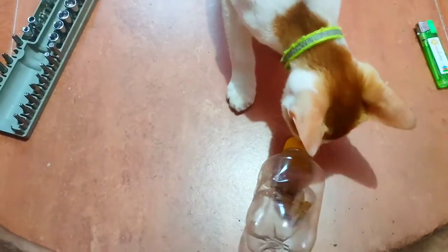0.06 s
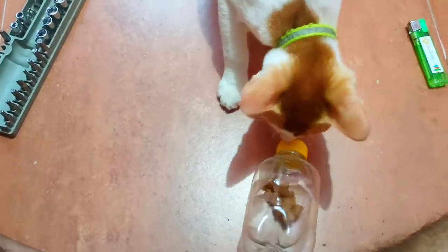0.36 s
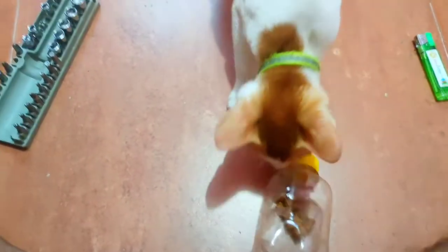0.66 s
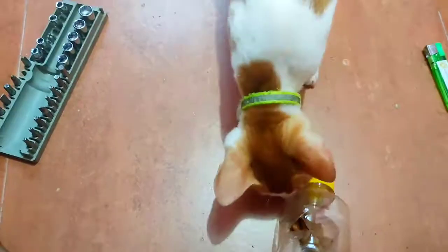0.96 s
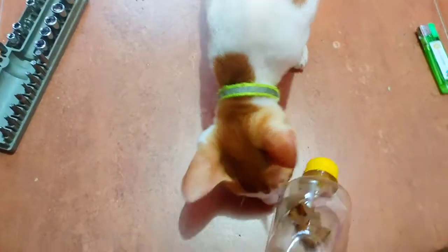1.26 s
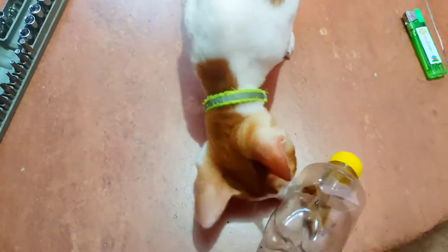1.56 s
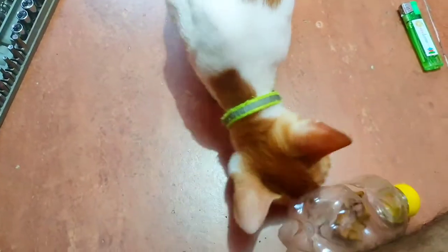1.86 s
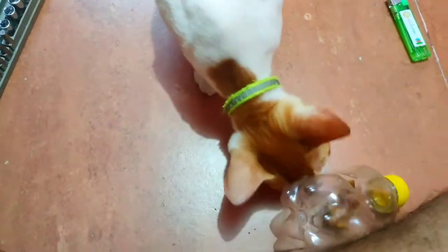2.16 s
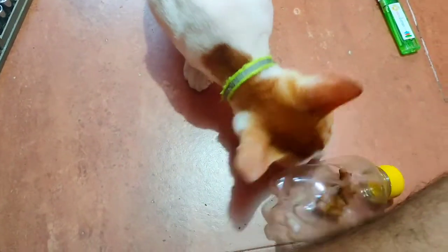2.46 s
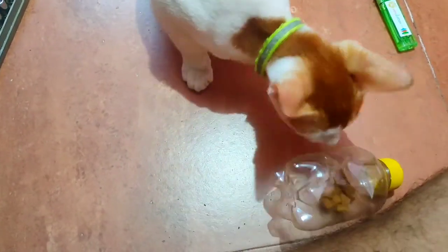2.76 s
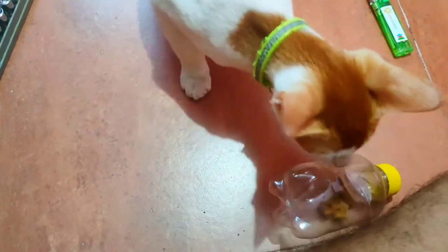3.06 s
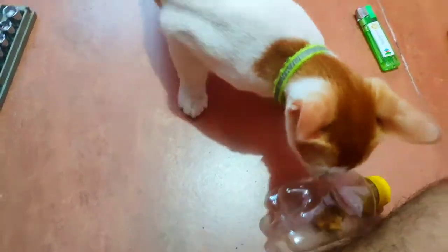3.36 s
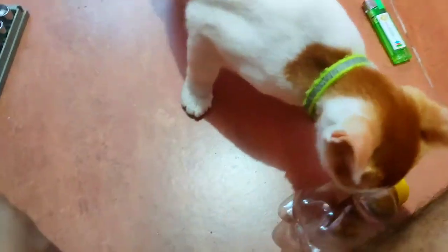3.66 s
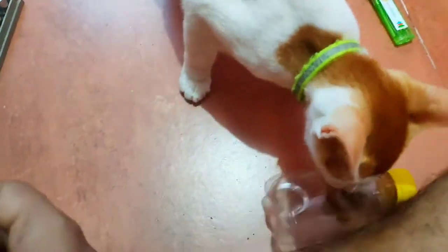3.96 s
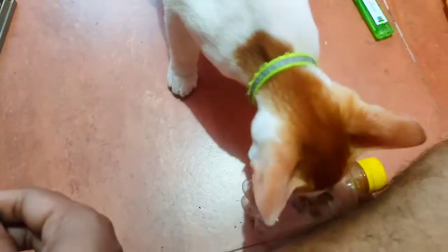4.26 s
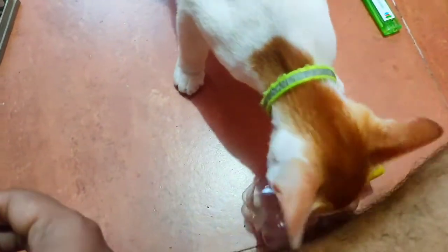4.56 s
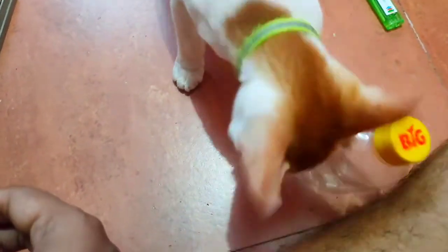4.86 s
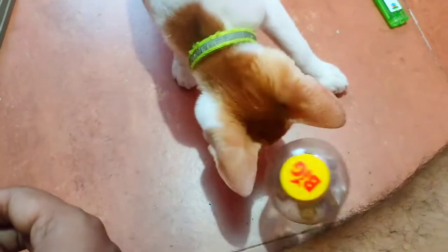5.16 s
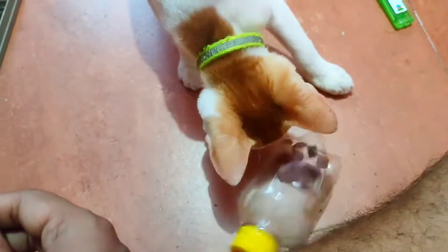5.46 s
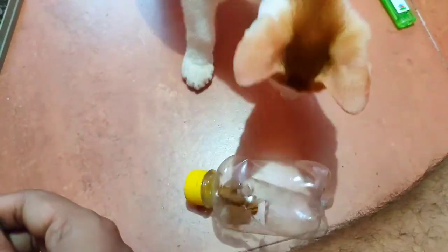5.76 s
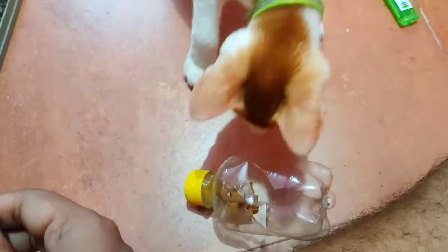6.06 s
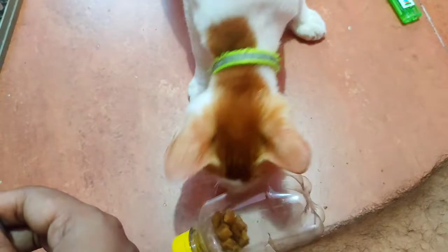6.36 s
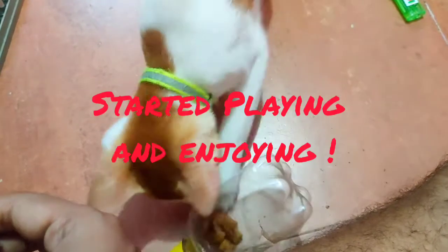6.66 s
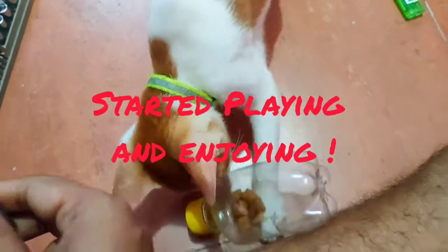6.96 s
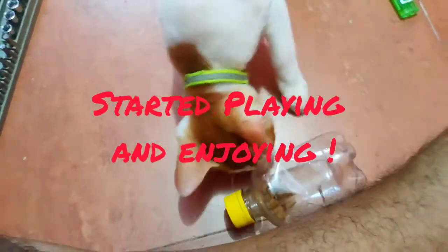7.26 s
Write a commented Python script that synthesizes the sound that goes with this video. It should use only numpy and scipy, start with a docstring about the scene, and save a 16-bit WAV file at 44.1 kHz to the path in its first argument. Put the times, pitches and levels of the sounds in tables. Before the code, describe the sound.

In a small room with a steady rush of air, a puppy softly nudges and scuffs a thin plastic bottle across a hard floor, close to the microphone. The bottle knocks hollowly, its dents pop and a few dry treats rattle inside. After a lull, fur rubs the plastic, and the bottle tips up in a clatter of treats, topples and chatters on its rim. More nudges lead to a last few knocks and a rattle.

```python
"""A small room with a hard floor and a steady rush of air; a stereo microphone sits close to a thin plastic
bottle with a few dry treats in it. A puppy's fur rubs the plastic, its nose nudges the bottle and scuffs it
along. Then dents pop, the bottle knocks on the floor and rings, and the treats rattle against its wall.
Near 5 s, amid thin hisses, it tips up on its base, topples and chatters on its rim.
More nudges follow, and a last few knocks and a rattle at 7 s."""
import sys
import numpy as np
from scipy import signal
from scipy.fft import rfft, irfft, next_fast_len
from scipy.io import wavfile
from scipy.ndimage import uniform_filter1d

SR = 44100
rng = np.random.default_rng(int(sys.argv[2]) if len(sys.argv) > 2 else 0)


def log_audio(samples):
    """Write samples as a 16-bit WAV file to the path given in sys.argv[1]."""
    # one column per channel
    frames = np.atleast_2d(samples).T
    # limit to full scale, then quantise
    limited = np.clip(frames, -1, 1)
    pcm = np.round(limited * 32767).astype(np.int16)
    wavfile.write(sys.argv[1], SR, pcm)


N = 322342
TAPS = 2048
GRID = np.fft.rfftfreq(TAPS, 1 / SR)  # f/Hz on which filter gains are drawn

# the bottle, close up, at the microphone's two ports
PORT_BALANCE = [(300, 0), (900, 0.5), (1500, -8.5), (3000, -10), (4200, -2.5), (5900, -3), (7500, -15),
                (10000, -8), (14000, 8)]  # f/Hz, left-right/dB
PORT_LIKENESS = [(300, 0.67), (900, 0.66), (1600, 0.37), (3000, 0.023), (8000, 0.15)]  # f/Hz, left-right correlation


def amp(db):
    """Decibels to gain."""
    return 10 ** (np.asarray(db) / 20)


def level(x):
    """Rms level in dB."""
    return 10 * np.log10(np.mean(x ** 2) + 1e-20)


def unit(x):
    """A stereo sound scaled so that its mid signal has rms 1."""
    return x / amp(level(x.mean(0)))


def curve(points, hz=GRID):
    """Rows of (f/Hz, value) joined on a log-frequency axis."""
    f, value = np.transpose(points)
    return np.interp(np.log(hz + 1), np.log(f + 1), value)


def bump(hz, width_hz, db):
    """A bell-shaped peak or dip as a gain in dB."""
    return db * np.exp(-(2 * (GRID - hz) / width_hz) ** 2)


def sides(balance_db):
    """Left and right gains in dB for a left-right difference, at constant power."""
    both = np.array([balance_db, -balance_db]).reshape(2, -1) / 2
    return both - 10 * np.log10(np.mean(amp(both) ** 2, axis=0))


def add(mix, s, sound):
    """Mixes a stereo sound in at time s."""
    part = mix[:, max(round(s * SR), 0):][:, :sound.shape[1]]
    part += sound[:, :part.shape[1]]


def colour(x, gain_db):
    """Minimum-phase filter with the given gain, so that attacks stay sharp."""
    cepstrum = irfft(np.log(amp(np.atleast_2d(gain_db))))
    lag = np.arange(TAPS)
    causal_fold = 1 + np.sign(TAPS / 2 - lag) * (lag > 0)
    kernel = irfft(np.exp(rfft(cepstrum * causal_fold)))
    return signal.oaconvolve(x, np.broadcast_to(kernel, (2, TAPS)), axes=1)[:, :x.shape[1]]


def noise_pair(size, likeness, lead_rad=0):
    """White noise at the two ports, correlated by frequency; the left leads in phase."""
    padded = next_fast_len(size)
    common, separate = rfft(rng.standard_normal((2, padded)))
    same = np.clip(curve(likeness, np.linspace(0, SR / 2, len(common))), -1, 1)
    right = same * common + np.sqrt(1 - same ** 2) * separate
    return irfft([common * np.exp(1j * lead_rad), right], padded)[:, :size]


def air(level_db=-45, waver_db=0.5, flat_below_hz=245):
    """The room's steady rush behind the bottle, with a few resonances, wavering a little."""
    spectrum = [(150, -12), (260, -4.5), (298, -14), (367, -4.5), (429, -4), (546, -7.5), (671, 1.5),
                (811, -7), (1110, -4.5), (1210, -8), (1560, -7.5), (5310, -26.5), (7620, -12.5),
                (10000, -29.5), (16000, -39)]  # the rush: f/Hz, level/dB
    peaks = [(307.3, 27, 16), (421.5, 32, 3.5), (510, 92, -1), (675, 116, -3.5), (7930, 890, -3),
             (15300, 3200, 8)]  # its resonances: f/Hz, width/Hz, gain/dB
    balance = [(60, -15), (110, 22.5), (200, -4), (380, 2.5), (700, -2), (1290, -1.5), (2380, -4.5),
               (4400, 1), (8120, -8.5), (15000, 5)]  # its lean at the microphone: f/Hz, left-right/dB
    likeness = [(60, 0.99), (130, 0.99), (290, 0.97), (640, 0.55), (1410, -0.25), (3100, 0.2),
                (6820, -0.16), (15000, 0.064)]  # its stereo width: f/Hz, left-right correlation
    shape_db = curve(spectrum, np.maximum(GRID, flat_below_hz)) + sum(bump(*peak) for peak in peaks)
    rush = colour(noise_pair(N + TAPS, likeness), shape_db + sides(curve(balance)))
    knots = rng.standard_normal(N * 10 // SR)
    waver = np.interp(np.arange(N), np.linspace(0, N, len(knots)), knots)
    return unit(rush[:, TAPS:]) * amp(level_db + waver_db * waver)


def rubbing(gain_db=4, grain_db=1.0, grain_s=0.0034, skew=0.68, sharpness=2.06):
    """Fur slides over the plastic: a grainy hiss that swells faster than it fades with each stroke."""
    strokes = [(0.537, 0.18, -54), (1.12, 0.19, -64), (4.495, 0.35, -39.5), (5.061, 0.28, -49),
               (5.316, 0.14, -56)]  # strokes of fur: t/s, length/s, level/dB
    spectrum = [(150, -28), (250, -6), (287, -8.5), (360, 2), (393, -7.5), (662, -5.5), (723, -5),
                (1880, -11), (2200, -7.5), (5630, -21.5), (7190, -10.5), (10500, -28.5), (16000, -26)]  # fur on plastic: f/Hz, level/dB
    out = np.zeros((2, N))
    for start, length, db in strokes:
        t = np.arange(0, length, 1 / SR)
        grain = uniform_filter1d(rng.standard_normal(len(t)), round(grain_s * SR))
        hiss = noise_pair(len(t), PORT_LIKENESS) * amp(grain_db * grain / grain.std())
        hiss = unit(colour(hiss, curve(spectrum) + sides(0.34 * curve(PORT_BALANCE))))
        arch = abs(np.sin(np.pi * (t / length) ** skew)) ** sharpness
        add(out, start, hiss * amp(gain_db + db) * arch)
    return out


def pose(s):
    """How the bottle lies at time s; its two strongest modes shift as the treats load the wall."""
    poses = [(2.45, 0.09, 428, 906), (4.0, 0.09, 353, 923), (4.82, 0.26, 397, 945), (4.925, 0.92, 399, 936),
             (4.97, 0.7, 371, 940), (5.005, 0.63, 363, 920), (5.06, 0.88, 341, 955), (5.419, 0.1, 425, 925),
             (5.5, 0.53, 425, 923), (5.62, 0.24, 416, 935), (5.78, 0, 415, 914), (7.06, 0, 400, 943),
             (7.2, 0.13, 420, 950)]  # tilt and tuning: t/s, upright share 0-1, drum mode f/Hz, hoop mode f/Hz
    when, *columns = np.transpose(poses)
    return [np.interp(s, when, column) for column in columns]


def wall_modes(s, t, ring, drum_db, spot_modes, lead_rad, drum_t60=0.15, scatter_db=3, detune=0.015):
    """The bottle's clear modes, struck at time s; ring scales their decay times."""
    modes = [(719, 0.19, 0, -7), (730, 0.034, -23, 11), (985, 0.16, -1.5, -9), (1098, 0.063, 0, -14),
             (1364, 0.09, 9.5, -32), (1469, 0.11, 6, -3), (1560, 0.13, -18, 8.5), (1908, 0.11, -1.5, 1.5),
             (2240, 0.077, -2, 0), (2452, 0.058, 4, 2), (2774, 0.049, 2, 9), (3470, 0.051, -21, 13),
             (3700, 0.094, -7, -5), (4500, 0.023, -1, -28)]  # the wall: f/Hz, t60/s, level on its side/dB, on its base/dB
    hoop = (0.11, 2.9, 11.3)  # the hoop mode: t60/s, level on its side/dB, on its base/dB
    upright, drum_hz, hoop_hz = pose(s)
    hz, t60, side_db, base_db = np.transpose([(hoop_hz, *hoop), *modes])
    db = side_db + upright * (base_db - side_db) + scatter_db * rng.standard_normal(len(hz))
    hz = hz * (1 + detune * rng.standard_normal(len(hz)))  # the soft wall is bent differently each time
    hz, t60, db = np.vstack([(drum_hz, drum_t60, drum_db), np.c_[hz, t60, db], *spot_modes]).T
    turns = np.outer(hz, t)
    turns[:2] = np.cumsum(pose(s + t)[1:], axis=1) / SR  # the drum and hoop modes glide while they ring
    # high modes radiate in lobes and reach the two ports out of step
    spread = np.sqrt(-np.log(np.clip(curve(PORT_LIKENESS, hz), .01, 1)))
    phase = np.array([lead_rad + spread * rng.standard_normal(len(hz)), 0 * hz])
    waves = np.exp(2j * np.pi * turns - np.outer(np.log(1000) / (t60 * ring), t))
    return ((amp(db) * np.exp(1j * phase)) @ waves).imag


def shell(s, ring, drum_db=1.8, spot_modes=(), modes_db=-24, flex_t60=0.04, flex_hz=2200,
          crack_db=-2, crack_t60=0.0081, push_db=15, lead_rad=0.13):
    """One tap heard close up: clear modes, the flexing wall's crowd of short ones, a crack and a push."""
    regions = [(266, 147, -13), (600, 430, -4.5), (4080, 900, 0), (5640, 1840, -6.5)]  # where the thin wall radiates badly: f/Hz, width/Hz, gain/dB
    port_peak = (7310, 3900, 18.1)  # the microphone port's resonance: f/Hz, width/Hz, gain/dB
    port_top = (16500, 1500, 6.2)  # its second resonance: f/Hz, width/Hz, gain/dB
    t = np.arange(SR // 8) / SR
    clear = amp(modes_db) * wall_modes(s, t, ring, drum_db, spot_modes, lead_rad)
    flex = noise_pair(len(t), PORT_LIKENESS, lead_rad) * amp(-60 * t / (flex_t60 * ring))
    flex = signal.lfilter(*signal.butter(1, flex_hz, fs=SR), flex)
    crack = noise_pair(len(t), PORT_LIKENESS, lead_rad) * amp(crack_db - 60 * t / crack_t60)
    push = signal.lfilter(*signal.butter(2, flex_hz, fs=SR), amp(push_db) * (t == 0))
    wall_db = sum(bump(*region) for region in regions)
    microphone_db = bump(*port_peak) + bump(*port_top) + sides(curve(PORT_BALANCE))
    return colour(clear + flex + crack + push, wall_db + microphone_db)


def blow(s, level_db, weight_db, hardness_db, pan_db, rise_s, spot,
         attack_s=0.0065, pivot_hz=1244, port_pan_db=-5.5):
    """One blow rings the shell: weight gives the thud, hardness tilts the spectrum in dB per octave."""
    # places on the bottle: ring time factor, hollowness/dB, own modes as (f/Hz, t60/s, level/dB)
    spots = {"shoulder": (0.68, 0.68, [(706, 0.12, 29.5), (586, 0.032, 34.5), (1100, 0.12, 8),
             (1430, 0.057, 19)]), "belly": (0.53, 3.2, [(757, 0.13, 1), (890, 0.12, -12), (1104, 0.13, -2),
             (1560, 0.093, 4), (1780, 0.048, 15), (2550, 0.048, 13), (3130, 0.037, 11)]),
             "rib": (0.82, -2.1, [(1380, 0.06, 15), (1970, 0.035, 17), (3600, .07, -5)]),
             "flank": (0.54, -1, [(718, 0.11, 10.5), (980, 0.07, -2), (1338, 0.064, 16.5),
             (1880, 0.076, 14), (2270, .04, 8), (3900, 0.054, 14)]), "base": (0.39, 7.2, [(794, 0.086, 17),
             (1125, 0.16, 4), (1540, 0.22, 7), (2370, 0.15, 13), (3950, 0.046, 16), (4290, 0.047, 23),
             (5200, 0.025, 13), (7900, 0.03, 5)]), "waist": (1, -3, [(350, 0.13, 13), (895, 0.14, 6),
             (1170, 0.14, 6), (1530, 0.07, 3)]), "neck": (0.93, 4.3, [(2850, 0.03, 15), (3840, 0.036, 14),
             (5430, 0.02, 11), (6060, 0.025, 5)]), "rim": (0.55, 0.25, [(1439, 0.12, 6), (2235, 0.052, 8)]),
             "heel": (0.9, 2.4, [(3550, 0.051, -3)]), "side": (0.7, -0.5, [(1390, 0.14, 4.5),
             (2194, 0.054, 8)]), "dent": (0.67, 9.2, [(899, 0.091, 8), (3760, 0.07, 16), (4380, 0.04, 16),
             (5650, 0.099, 11.5), (5720, 0.04, 16), (7440, 0.03, -4), (8840, 0.095, -1), (10000, 0.05, 10),
             (11300, .05, -5), (13700, 0.04, 3), (15300, 0.04, 8), (15690, .08, 4)]),
             "crease": (0.78, 0, [(2970, .03, 3), (3930, 0.029, -1), (6050, 0.028, -21),
             (8500, 0.027, 14)])}
    edges = [250, 600, 1200, 2500, 6000, 10000, 16000]  # edges of the registers that a contact excites: f/Hz
    contact_db = [-9.5, -4, -1, -7.5, -13, -25]  # a plain blow's start in each register: level/dB
    ring, hollow_db, spot_modes = spots[spot]
    drum_db = 9.5 + 0.7 * weight_db  # a heavy blow drives the drum mode
    sound = shell(s, ring, drum_db, spot_modes)
    rise = 1 - np.exp(-np.arange(sound.shape[1]) / (rise_s * SR))
    sound = sound * rise * amp(sides(pan_db - port_pan_db))  # the ports already lean to the right
    bands = list(zip(edges, edges[1:]))
    registers = [signal.butter(3, band, "band", fs=SR, output="sos") for band in bands]
    centres = np.sqrt(np.prod(bands, axis=1))
    tilt_db = hardness_db * np.log2(centres[1:] / pivot_hz)
    band_db = level_db + np.array(contact_db) + np.r_[weight_db, tilt_db]
    band_db += hollow_db * np.array([0, 1, -1, 0, 0, 0])  # a hollow spot favours the lower middle
    for _ in range(2):  # the contact sets how strong each register starts
        attack = sound.mean(0)[:round(attack_s * SR)]
        attack_db = np.array([level(signal.sosfilt(register, attack)) for register in registers])
        sound = colour(sound, curve(np.c_[centres, band_db - attack_db]))
    return sound


def nudges():
    """The puppy's nose bumps the bottle softly."""
    touches = [(.756, -44.5, "rib"), (1.215, -51, "belly"), (4.135, -51, "side"), (4.345, -42, "flank"),
               (6.139, -45, "side"), (6.269, -47, "side"), (6.334, -47, "side"), (6.784, -49, "belly")]  # nose on plastic: t/s, level/dB, spot
    out = np.zeros((2, N))
    for s, db, spot in touches:
        add(out, s, blow(s, db, weight_db=-6.5, hardness_db=-2.5, pan_db=-5, rise_s=0.002, spot=spot))
    return out


def scuffs(slips_per_s=500, ring=0.54):
    """The pushed bottle sticks and slips on the floor; each tiny slip taps the shell."""
    slides = [(1.127, 0.19, -51.5), (1.749, 0.11, -52), (4.117, 0.06, -48.5), (6.13, 0.097, -52),
              (6.209, 0.16, -51.5), (6.752, 0.049, -48.5)]  # faint slides: t/s, length/s, level/dB
    tone = [(350, -12), (900, 5), (1700, 1), (3000, -4), (7000, -17)]  # plastic on the floor: f/Hz, gain/dB
    out = np.zeros((2, N))
    for start, length, db in slides:
        t = np.arange(0, length, 1 / SR)
        slips = (rng.random(len(t)) < slips_per_s / SR) * rng.standard_normal(len(t))
        slips *= np.sin(np.pi * t / length)
        tap = colour(shell(start, ring), curve(tone))
        scuff = signal.fftconvolve(tap, slips[None], axes=1)
        add(out, start, scuff * amp(db - level(scuff.mean(0)[:len(t)])))
    return out


def pops():
    """Dents and creases in the thin wall pop with a bright crackle."""
    snaps = [(1.59, -50, -1, "neck"), (2.371, -41.5, -15, "crease"), (2.5514, -35, -2, "dent"),
             (2.5613, -51, 3, "crease"), (4.6946, -37.5, -8, "crease"), (4.8206, -32.5, -1, "crease")]  # the wall buckles: t/s, level/dB, left-right/dB, spot
    out = np.zeros((2, N))
    for s, db, pan_db, spot in snaps:
        add(out, s, blow(s, db, weight_db=-2, hardness_db=7, pan_db=pan_db, rise_s=0.0003, spot=spot))
    return out


def knocks():
    """The bottle knocks on the hard floor, close to the microphone."""
    # impacts: t/s, level/dB, weight/dB, hardness/(dB per octave), left-right/dB, rise/s, spot
    impacts = [(1.829, -39.5, -10, -9, -16, 0.0006, "rib"), (1.842, -39, -20, -8.5, -3, 0.0023, "rib"),
               (2.163, -25.5, 7.5, -8.5, -9.5, 0.00013, "shoulder"),
               (2.188, -46, 3, -18, -6, 0.0045, "shoulder"), (2.3706, -18.5, -2, -0.5, -6, 0.002, "belly"),
               (2.4103, -36, 6.5, -1, -3, 0.0011, "belly"), (2.447, -42.5, 12.5, 2.5, -6, 0.0016, "belly"),
               (2.5467, -26.5, -13, -3.5, -9, 0.00018, "rib"), (2.557, -35, -12, -6.5, -5, 0.00091, "heel"),
               (2.5742, -37.5, -6, -4, -12, 0.00071, "rib"), (3.988, -41.5, 10.5, -4, -3, 0.0016, "waist"),
               (4.009, -40, 5.5, -6, -7, 0.0032, "waist"), (4.8203, -21.5, 5.5, 3.5, -1, 0.00035, "base"),
               (4.9655, -27, 2.5, 2.5, -5.5, 0.00036, "heel"), (5.4805, -32.5, -4, -9.5, -4, .0007, "heel"),
               (7.0625, -18.5, -2, -3.5, -6, 0.00012, "flank"), (7.086, -28, -1, -5, -6, 0.00028, "flank"),
               (7.0986, -30.5, -16, -8, -11, 0.0026, "rib"), (7.1522, -35.5, 6.5, -2.5, -7, 0.0005, "side"),
               (7.191, -34, 4, 0, -5, 0.0017, "side"), (7.213, -39.5, 5.5, 2.5, -2.5, 0.0018, "side")]
    out = np.zeros((2, N))
    for s, *contact in impacts:
        add(out, s, blow(s, *contact))
    return out


def treats(per_s=700, size_db=4, split_hz=3000, ring=0.49, slide_s=.025, clear_db=-21):
    """Dry pellets of uneven size patter on the wall, sliding on to a new spot as the bottle turns."""
    shakes = [
        [(2.39, -47), (2.45, -43.5), (2.49, -42.5), (2.51, -63)],
        [(3.995, -41.5), (4.04, -45.5), (4.07, -50)],
        [(4.755, -49), (4.79, -36), (4.875, -40), (4.925, -27.5), (4.955, -35.5), (5.0, -35), (5.06, -37.5),
         (5.1, -44.5), (5.14, -69)],
        [(5.39, -48), (5.425, -42), (5.495, -44.5), (5.585, -59), (5.61, -38), (5.68, -38.5), (5.77, -40.5),
         (5.81, -56)],
        [(7.09, -37), (7.14, -67), (7.2, -44.5), (7.28, -64)],
    ]  # tumbling treats, one list a shake: t/s, level/dB
    tone = [(300, -1), (420, -2), (560, -18), (950, 0), (1400, 2.5), (2500, 0), (3600, -9.5), (5200, -7),
            (8500, -11.5), (10500, -10.5), (16000, -19)]  # treats on the wall: f/Hz, gain/dB
    base_tone = [(370, 10.5), (600, 8), (950, 6), (1300, -13.5), (2400, 6.5), (3600, 15.5), (5000, -5),
                 (7500, -10), (12000, -7)]  # added when they land on the stiff base: f/Hz, gain/dB
    out = np.zeros((2, N))
    step, chance = round(slide_s * SR), per_s / SR
    halves = [signal.butter(3, split_hz, kind, fs=SR, output="sos") for kind in ("low", "high")]
    lands = rng.random(N) < chance
    sizes = amp(size_db * (np.minimum(rng.exponential(1, N), 2) - 0.5))
    hits = lands * sizes / np.sqrt(chance)
    for shake in shakes:
        times, db = np.transpose(shake)
        for first in range(round(times[0] * SR), min(round(times[-1] * SR), N - step), step):
            s, span = first / SR, first + np.arange(step)
            upright = pose(s)[0]
            spot = shell(s, ring, modes_db=clear_db + 0.5 * upright)
            spot = colour(spot, curve(tone) + upright * curve(base_tone))
            force = hits[span] * amp(np.interp(span / SR, times, db))
            treble_db = -10.5 + 3.5 * upright  # duller on the soft side than on the stiff base
            for half, gain in zip(halves, (1, amp(treble_db))):
                tap = signal.sosfilt(half, spot)
                tap *= gain / np.linalg.norm(tap.mean(0))
                add(out, s, signal.fftconvolve(tap, force[None], axes=1))
    return out


def clumps(side_weight_db=-7.5, upright_extra_db=9.5):
    """Clumps of treats land over a few milliseconds on whichever part of the bottle is lowest."""
    landings = [(4.0131, -50, 7.5, -13, 0.0015), (4.764, -43, 4, -10, 0.00088),
                (4.7738, -37, 3.5, -8, 0.00017), (4.789, -33, 1.5, -7, 0.00049),
                (4.856, -38, 3, 8, 0.00072), (4.876, -39, 1, -4, .0005), (4.8955, -33.5, 3, -6, 0.0017),
                (4.915, -28, 3, -4, 0.0032), (4.9205, -33, 4.5, -11, 0.002), (4.9295, -39, 6, -4, 0.00084),
                (4.9375, -39, 2.5, -3, 0.0005), (4.949, -34, 3.5, -7, 0.0012), (4.991, -36, 4, -7, 0.0005),
                (4.999, -34.5, 5.5, -5, 0.00051), (5.023, -41, 8, -13, 0.00055),
                (5.0415, -47, 8.5, -11, 0.00041), (5.049, -35.5, 1.5, -7, 0.0025),
                (5.0925, -43, 2, -3, 0.00091), (5.4125, -36.5, 3, 7, 0.00032), (5.439, -34, -1, -8, 0.0013),
                (5.46, -44, 3.5, -11, .001), (5.478, -32, 0.5, -12, 0.0032), (5.494, -30, 0.5, -4, 0.00088),
                (5.519, -39, 0.5, -4, .0006)]  # clumps: t/s, level/dB, hardness/(dB per octave), left-right/dB, spread/s
    tone = [(4000, -0.5), (8000, -4.5), (12000, -13)]  # crumbly treats give little top treble: f/Hz, gain/dB
    out = np.zeros((2, N))
    for s, db, hardness_db, pan_db, spread_s in landings:
        upright = pose(s)[0]
        weight_db = side_weight_db + upright_extra_db * upright
        spot = "heel" if upright > .5 else "side"
        add(out, s, blow(s, db, weight_db, hardness_db, pan_db, spread_s, spot))
    return colour(out, curve(tone))


def high_hiss(fade_db=11, ramp_s=0.004):
    """Brief, thin hisses at the top of the treble start at once and die away."""
    bursts = [(4.495, 0.09, -55), (4.823, 0.085, -48), (5.112, 0.14, -62), (5.33, 0.09, -55)]  # hisses: t/s, length/s, level/dB
    spectrum = [(7000, -25), (10000, -6), (13000, -2), (15500, -3)]  # their tone: f/Hz, level/dB
    out = np.zeros((2, N))
    for start, length, db in bursts:
        t = np.arange(0, length, 1 / SR)
        hiss = unit(colour(noise_pair(len(t), PORT_LIKENESS), curve(spectrum)))
        ramps = np.minimum(np.minimum(t, length - t) / ramp_s, 1)
        add(out, start, hiss * amp(db - fade_db * t / length) * ramps)
    return out


def bounces(weight_db=-4):
    """The toppled bottle chatters on its rim; the floor damps each hop quickly."""
    hops = [(5.548, -29, -2, -9, 0.0024), (5.554, -26.5, 1.5, -6, .001), (5.56, -33.5, 1.5, -13, 0.00029),
            (5.595, -26.5, 1, -5.5, 0.0024), (5.602, -27, -4, -5.5, .0008), (5.61, -32, -3, -11, 0.00051),
            (5.622, -30, -0.5, -1, .001), (5.6277, -27.5, 0.5, -9, 0.0011), (5.635, -32.5, 0, -7, .0006),
            (5.643, -39, 1, -8, .0008), (5.652, -32.5, 3, -9, 0.00081), (5.663, -36, 1, -7, .0008),
            (5.669, -34, 2, -14, 0.00093), (5.6762, -27, -0.5, -6, 0.00063),
            (5.697, -31, -0.5, -9, 0.00068), (5.716, -39, -1, -4, 0.0009), (5.734, -35, -1.5, -4, .0015),
            (5.766, -40, 0, -6, 0.0013)]  # rim on floor: t/s, level/dB, hardness/(dB per octave), left-right/dB, rise/s
    tone = [(2500, 0.5), (8000, -4.5), (12000, 1)]  # the hard floor keeps the top treble: f/Hz, gain/dB
    out = np.zeros((2, N))
    for s, db, hardness_db, pan_db, rise_s in hops:
        add(out, s, blow(s, db, weight_db, hardness_db, pan_db, rise_s, "rim"))
    return colour(out, curve(tone))


def room(x, wet_db=-14, first_s=0.0079):
    """Scattered reflections from the near walls, the top treble dying first."""
    decay = [(300, 0.32), (1000, 0.27), (4000, 0.3), (12000, 0.19)]  # the small room's reverberation: f/Hz, t60/s
    hz, t, spectra = signal.stft(noise_pair(SR // 2, PORT_LIKENESS), SR, nperseg=256)
    tail = signal.istft(spectra * amp(-60 * t / curve(decay, hz)[:, None]), SR)[1]
    tail *= np.arange(tail.shape[1]) > first_s * SR
    tail /= np.linalg.norm(tail[0])
    return x + amp(wet_db) * signal.fftconvolve(x, tail, axes=1)[:, :N]


def scene():
    """The bottle and its treats close to the microphone, the room and its air behind."""
    bottle = knocks() + nudges() + pops() + bounces()
    close = bottle + clumps() + treats() + rubbing() + high_hiss() + scuffs()
    return room(close) + air()


def record(dry, low_cut_hz=281, faint_bass_db=-39, top_hz=16100):
    """A steep low cut, with a very faint bass left beneath it, then the band limit."""
    low_cut = signal.cheby1(N=8, rp=.5, Wn=low_cut_hz, btype="high", fs=SR, output="sos")
    band_limit = signal.firwin(511, top_hz, window=("kaiser", 9), fs=SR)
    thin = signal.sosfilt(low_cut, dry) + amp(faint_bass_db) * dry
    return signal.oaconvolve(thin, band_limit[None], "same")


dry = scene()
out = record(dry)
log_audio(out)
```